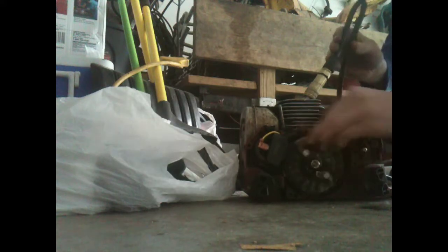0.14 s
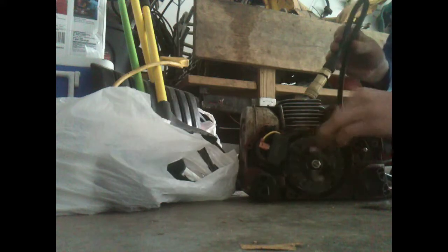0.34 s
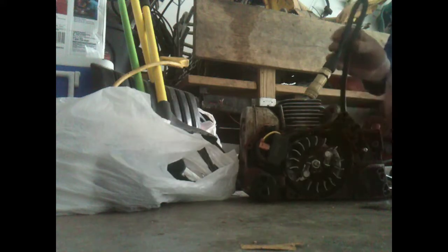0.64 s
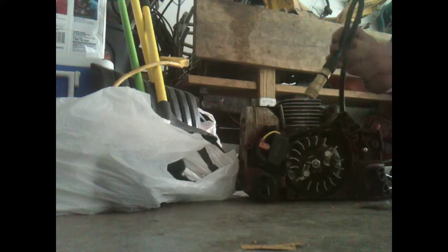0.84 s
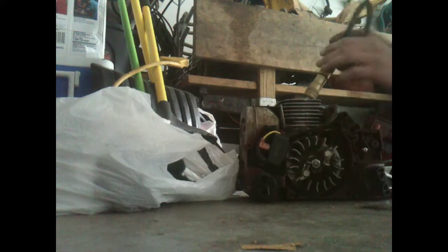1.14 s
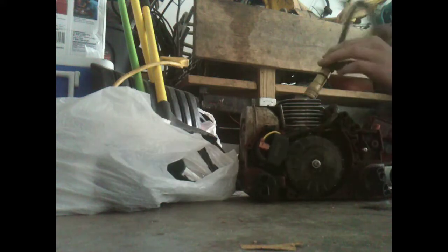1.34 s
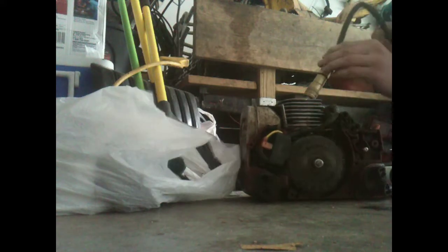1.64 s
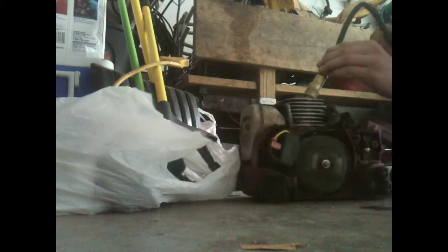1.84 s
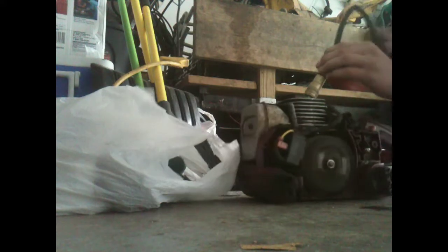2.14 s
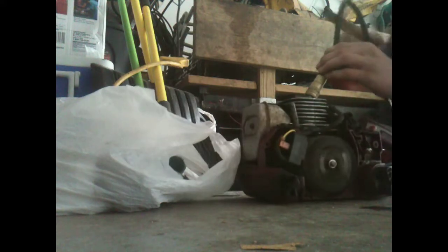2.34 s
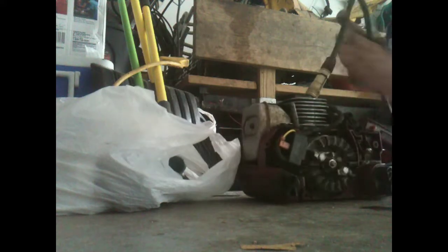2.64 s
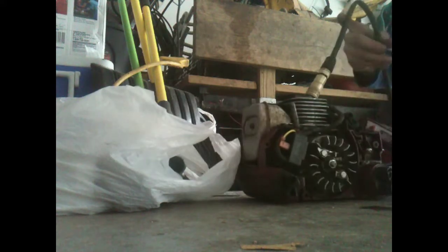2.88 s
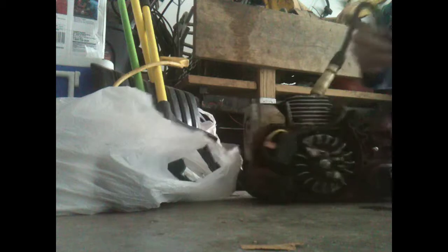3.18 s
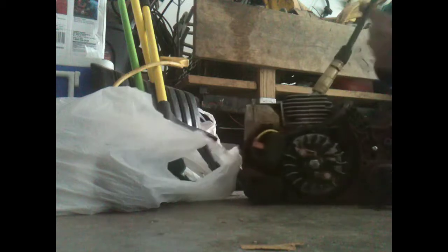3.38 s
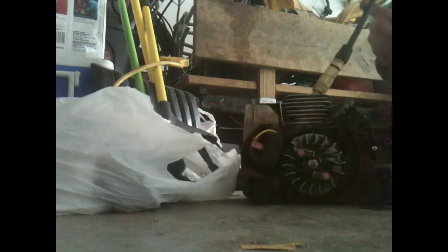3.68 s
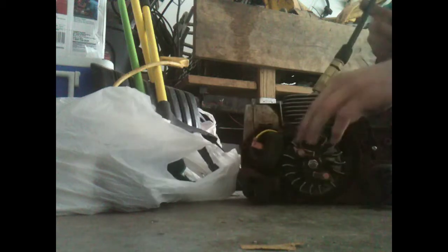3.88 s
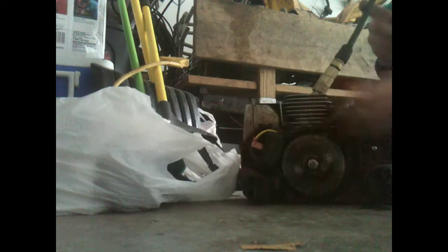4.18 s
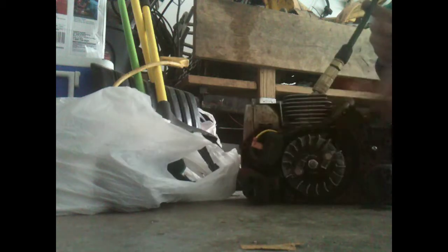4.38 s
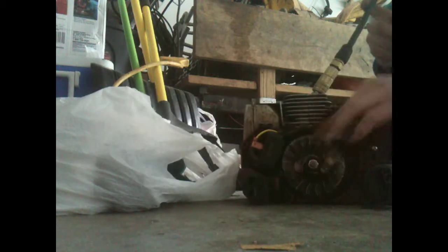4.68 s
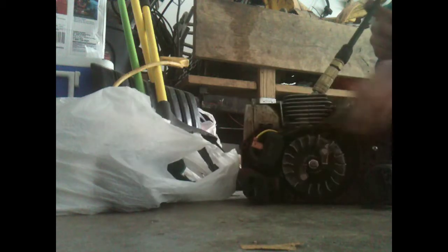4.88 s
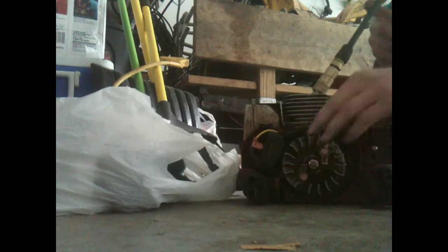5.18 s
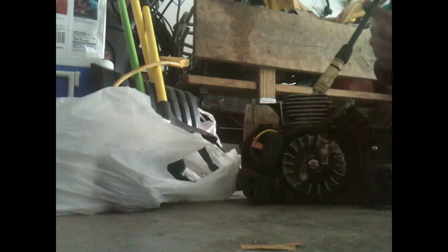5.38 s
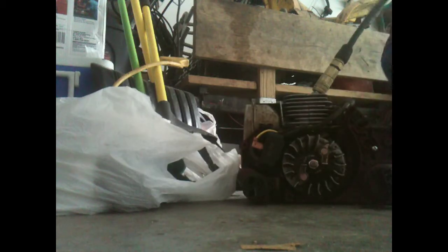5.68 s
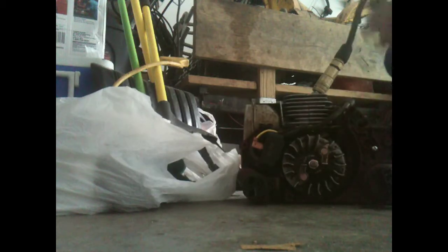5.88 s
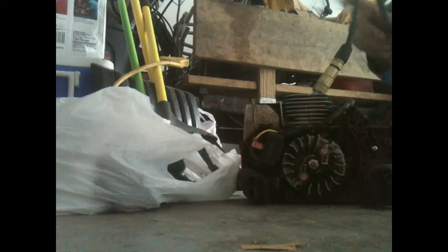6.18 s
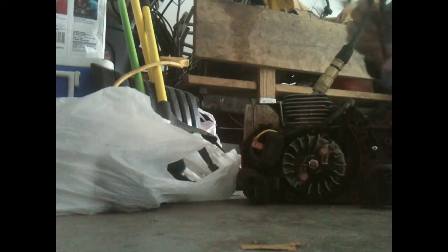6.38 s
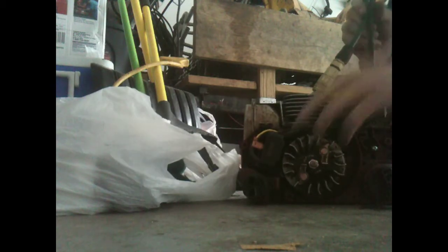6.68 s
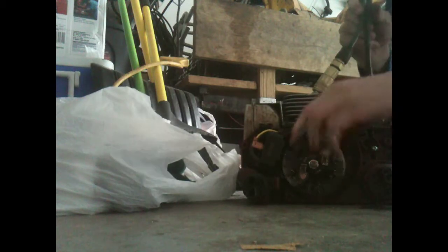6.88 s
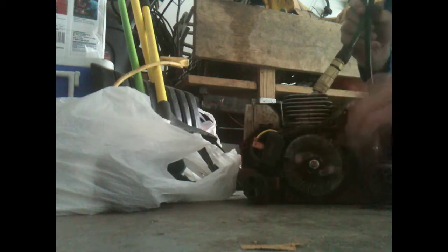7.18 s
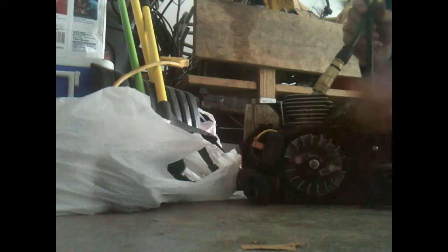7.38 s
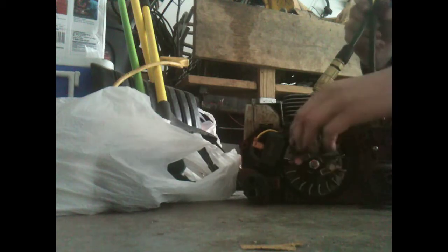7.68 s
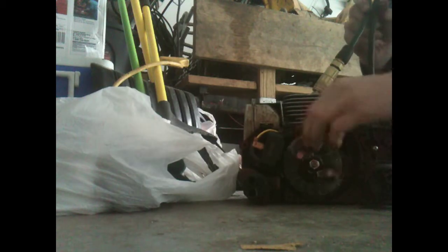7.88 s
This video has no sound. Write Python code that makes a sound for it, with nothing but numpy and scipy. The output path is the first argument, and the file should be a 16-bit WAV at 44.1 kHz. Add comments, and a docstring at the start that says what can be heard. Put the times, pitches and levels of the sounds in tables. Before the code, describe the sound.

In a garage, close to the microphone, small ticks and knocks lead into a one-second burst of rapid airy puffs as compressed air spins a small engine. It slows and stalls with a clack. A long, bright hiss with a thin whistle follows, wavering in strength and briefly choked, then cuts off. Quiet ticks, a soft pop, a sharp fin scrape and small knocks finish over faint rumble and hiss.

```python
"""Over low rumble and steady hiss come small ticks, a faint wheeze of air and sharp knocks on valve and cover.
A small two-stroke engine on a garage floor, fed compressed air by a hand valve, then spins for about a second,
puffing once a turn; it stalls and shaped noise hisses and whistles on through the open port.
Decaying modes ring as fingers flick the finned flywheel; trapped air pops and a nail scrapes the fins.
One close microphone feeds both channels, with a little echo of the garage."""
import sys
import numpy as np
from scipy import signal
from scipy.fft import rfft, irfft, next_fast_len
from scipy.io import wavfile
from scipy.ndimage import uniform_filter1d

SR = 44100
rng = np.random.default_rng(int(sys.argv[2]) if len(sys.argv) > 2 else 0)


def undo_db(level):
    """Turn decibels back into plain size, where 20 dB means ten times bigger."""
    steps = np.asarray(level, float) / 20
    return 10 ** steps


def unload_audio(sound):
    """Save the sound as a 16-bit wav file, at the path given as the first command line argument."""
    columns = np.transpose(np.atleast_2d(sound))
    # keep every value between -1 and 1, then stretch to whole-number steps
    steps = np.round(np.clip(columns, -1, 1) * 32767)
    wavfile.write(sys.argv[1], SR, steps.astype(np.int16))


N = 354123
TIME = np.arange(N) / SR


def noise(spectrum):
    """Noise of rms 1 with the colour of (Hz, dB) points."""
    size = next_fast_len(N)
    hz, db = np.transpose(spectrum)
    log_hz = np.log(np.arange(1, size // 2 + 2) * SR / size)
    colour = undo_db(np.interp(log_hz, np.log(hz), db))
    x = irfft(rfft(rng.standard_normal(size)) * colour, size)[:N]
    return x / np.std(x)


def walk(rate):
    """Smoothed random drift with spread 1, redrawn rate times a second."""
    k = int(SR / rate)
    steps = np.repeat(rng.standard_normal(N // k + 1), k)
    x = uniform_filter1d(uniform_filter1d(steps, k), k)[:N]
    return x / np.std(x)


def twice(x, modes):
    """Sum of steep resonances (Hz, width, dB): each one is passed two times."""
    out = 0
    for hz, width, db in modes:
        peak = signal.iirpeak(hz, hz / width, SR)
        out = out + undo_db(db) * signal.lfilter(*peak, signal.lfilter(*peak, x))
    return out


def wavering(x, modes, waver_db):
    """Steep resonances whose strengths drift apart as the flow shifts."""
    return sum(undo_db(waver_db * walk(6)) * twice(x, [mode]) for mode in modes)


def curve(table, lag_s=0.0):
    """A table joined by straight lines in time; very low outside it."""
    s, value = np.transpose(table)
    return np.interp(TIME - lag_s, s, value, left=-120, right=-120)


def hump(s, rise, fall):
    """0 at s, growing to 1 a rise before and a fall after it, and further beyond."""
    return np.where(TIME < s, (s - TIME) / max(rise, 0.003), (TIME - s) / max(fall, 0.003))


def decay(t, t60):
    """Exponential fade of 60 dB in t60 seconds."""
    return np.exp(-np.log(1000) * t / t60)


def add(out, s, sound):
    """Lay a sound into the track at s seconds."""
    i = int(s * SR)
    out[i:i + len(sound)] += sound[:N - i]


def ring(modes, length=0.93):
    """Decaying modes after one clean blow, swelling over 1.5 ms; length scales their ring times."""
    t = TIME[:SR // 2]
    hz, db, t60 = np.transpose(modes)[:, :, None]
    envelope = decay(t, t60 * length) * np.minimum(t / 0.0015, 1)
    return np.sum(undo_db(db) * envelope * np.sin(2 * np.pi * hz * t), axis=0)


def knock(modes, contact_s, centre_hz, spread_db):
    """A blow rings the modes near centre_hz most; the uneven contact rattles them on. Peak 1."""
    rattle_db = -4.5
    t = TIME[:SR // 2]
    hz, db, t60 = np.transpose(modes)[:, :, None]
    strength = undo_db(db - spread_db * np.abs(np.log2(hz / centre_hz)))
    rings = np.sum(strength * decay(t, t60) * np.sin(2 * np.pi * hz * t), axis=0)
    push = TIME[:SR // 25] / contact_s
    push = push * np.exp(-push) * rng.standard_normal(len(push))
    rattle = signal.fftconvolve(rings, push / np.sqrt(np.sum(push ** 2)))[:len(t)]
    x = rings * np.minimum(t / contact_s, 1) + undo_db(rattle_db) * rattle
    x = signal.lfilter(*signal.butter(2, centre_hz / 3, "high", fs=SR), x)
    return x / np.max(np.abs(x))


# Colour of the distant rumble. Each row: frequency in Hz, relative level in dB per Hz.
RUMBLE_COLOUR = [(12, -44), (30, -29.5), (120, -7.5), (200, -1), (470, -7), (870, -5.5), (1700, -14.5),
                 (3000, -25), (6000, -46)]
# Colour of the microphone hiss. Each row: frequency in Hz, relative level in dB per Hz.
HISS_COLOUR = [(500, -30), (1500, -1), (4000, -0.5), (6500, 0), (14500, 2), (15800, -3.5)]


def background():
    """Distant rumble and microphone hiss: two coloured noises whose levels drift slowly."""
    rumble = undo_db(-66 + 1.1 * walk(1.6)) * noise(RUMBLE_COLOUR)
    hiss = undo_db(-66.3 + 1.3 * walk(2.8)) * noise(HISS_COLOUR)
    return rumble + hiss


def crack(t60, hz, width):
    """A short burst of noise around hz, peak 1."""
    t = TIME[:SR // 20]
    x = twice(rng.standard_normal(len(t)) * decay(t, t60), [(hz, width, 0)])
    return x / np.max(np.abs(x))


# Small dry ticks. Each row: start in seconds, peak of the body in dB, its centre in Hz,
# peak of the bright snap in dB.
TICK_EVENTS = [(.21, -47, 5000, -65), (.352, -48, 7800, -72.5), (0.4449, -31, 7650, -33.5),
               (.455, -50, 7000, -34), (.8, -43.5, 7460, -58), (2.587, -39, 10600, -54),
               (2.598, -45.5, 8000, -57.5), (2.612, -49, 10000, -65), (6.453, -45, 8700, -64),
               (6.488, -48, 9600, -65), (6.616, -46, 11060, -59), (7.19, -38, 6160, -34),
               (7.636, -55, 7030, -53), (7.815, -60, 7000, -47.5), (7.827, -37, 6000, -38.5)]


def ticks():
    """Each tick is a noise burst around its own pitch, with a brighter snap on top."""
    out = np.zeros(N)
    for s, db, hz, snap_db in TICK_EVENTS:
        body = undo_db(db) * crack(0.0083, hz, 0.67 * hz)
        snap = undo_db(snap_db) * crack(0.008, 12900, 8000)
        add(out, s, body + snap)
    return out


# A slow hand turn wheezes air through the port. Each row: time of the peak in seconds, level in dB,
# rise in seconds, fall in seconds (each to the edge, where the level is 15 dB down).
WHEEZE_EVENTS = [(.23, -57.5, 0.12, .08), (.41, -60, .07, .04), (7.076, -53, .04, .04),
                 (7.155, -60, .03, .03), (7.445, -62, .04, .06), (7.86, -66.5, 0.018, .04),
                 (8.0, -66, .09, .1)]


def wheeze_flow():
    """Strength of the hand-turned air: rounded swells, falling ever faster in dB from the peak."""
    edge_db = -15
    return sum(undo_db(db + edge_db * hump(s, rise, fall) ** 2) for s, db, rise, fall in WHEEZE_EVENTS)


# Colour of the free air jet. Each row: frequency in Hz, relative level in dB per Hz.
JET_COLOUR = [(2500, -45), (3400, -19), (4300, -25), (5400, -17), (6200, -12), (7700, -9), (8500, -2),
              (10400, -2.5), (12600, -1.5), (13700, -1.5), (14800, -12), (15800, -10)]


def turbulent_jet(strength):
    """Air tearing out of the port: bright noise with a gently unsteady level."""
    return strength * undo_db(0.41 * walk(25)) * noise(JET_COLOUR)


# Valve and cover knocked. Each row: start in seconds, peak in dB, centre in Hz, contact in ms,
# fall-off away from the centre in dB per octave.
KNOCK_EVENTS = [(.453, -22.5, 1340, 0.93, 9), (0.46, -34, 1500, 0.94, 9), (0.5096, -24.5, 2500, 1.1, 13),
                (0.5436, -32, 1210, 1.1, 12), (1.304, -36.5, 1590, 2.4, 4), (1.395, -17, 2370, .6, 14),
                (2.4043, -17.5, 1720, 1.1, 9), (2.479, -25, 1990, 1.35, 1.5),
                (2.558, -41.5, 1295, 0.92, 9.5), (6.615, -47, 2000, 0.6, 9), (7.147, -53.5, 1300, 1.2, 9),
                (7.218, -30, 1770, 0.67, 11.5), (7.561, -34.5, 1720, 0.43, 15),
                (7.795, -48.5, 2130, 1.2, 19)]
# Modes of the cover. Each row: frequency in Hz, relative level in dB, 60 dB ring time in seconds.
COVER_MODES = [(500, -3.5, .04), (1011, -4, 0.06), (1160, -12, .02), (1293, -5, 0.027), (1500, 3.5, 0.022),
               (1730, 5, .014), (1945, -1, .014), (2252, 1, 0.014), (2593, -1, 0.011), (3130, -0.5, 0.014),
               (3840, -2.5, 0.013), (6000, 0.5, 0.011), (7040, 4.5, .006)]


def cover_knocks():
    """Each blow rings the cover, its pitch centre and contact time setting the tone."""
    out = np.zeros(N)
    for s, db, hz, contact_ms, spread_db in KNOCK_EVENTS:
        add(out, s, undo_db(db) * knock(COVER_MODES, contact_ms / 1000, hz, spread_db))
    return out


# Hand valve during the run. Each row: time in seconds, level of the leak past the piston in dB.
RUN_VALVE_LEVEL = [(1.31, -70.5), (1.33, -65.5), (1.385, -35.5), (1.45, -25), (1.55, -24.5), (1.8, -26),
                   (2.2, -28.5), (2.33, -29), (2.4, -40), (2.49, -51.5), (2.52, -58), (2.6, -64),
                   (2.74, -85.5)]
# Colour of the leak. Each row: frequency in Hz, relative level in dB per Hz.
LEAK_COLOUR = [(2000, -19), (3000, -9.5), (4300, -7.5), (5500, -3.5), (6500, -4), (9000, 0.5), (12500, 1),
               (15000, -4), (15800, -11)]


def piston_leak():
    """Air slipping past the piston follows the hand valve; returns its strength and its noise."""
    strength = undo_db(curve(RUN_VALVE_LEVEL))
    return strength, strength * noise(LEAK_COLOUR)


# Crank speed from the first port opening until the engine stalls.
# Each row: time in seconds, speed in turns per second.
CRANK_SPEED = [(1.392, 14.43), (1.487, 15.63), (1.567, 21.67), (1.697, 24.56), (1.817, 24.15),
               (2.247, 22.79), (2.337, 20.01), (2.437, 12.69), (2.53, 12.69)]


def port_flow():
    """Each turn the port opens fast, the flow sags as the cylinder empties, and the piston shuts it."""
    # shares of a turn
    rise_share, open_share, open_scatter, shut_share, transfer_share = 0.16, 0.52, 0.07, 0.17, 0.55
    puff_db, puff_scatter_db, sag_db, fill_lag_s = 11.5, 0.66, -3, 0.011
    roar_db, roar_scatter_db = -8.5, 1.5
    drum_db, drum_scatter_db, drum_speed_power, full_speed = -9, 5.5, 2.2, 24  # full speed in turns/s
    speed = np.maximum(curve(CRANK_SPEED), 0)
    turns = np.cumsum(speed) / SR
    turn, spinning = turns % 1, speed > 0
    # four random draws, held for one turn each
    draws = rng.standard_normal((int(turns[-1]) + 1, 4))
    puff, roar, drum, share = draws[turns.astype(int)].T
    past_open = turn - np.clip(open_share + open_scatter * share, 0.08, 0.8)
    # shutting takes a further 6, then 18 dB off the sagging flow
    shutting_db = np.interp(past_open, [0, shut_share, shut_share + 0.5], [0, -6, -18])
    shape_db = sag_db * turn / open_share + shutting_db
    charge_db = curve(RUN_VALVE_LEVEL, fill_lag_s) + puff_db + puff_scatter_db * puff
    charge = spinning * undo_db(charge_db)
    jet = charge * np.minimum(turn / rise_share, 1) * undo_db(shape_db)
    port_roar = jet * undo_db(roar_db + roar_scatter_db * roar)
    # the transfer port opens later in the turn; a faster piston drums harder
    thrum = charge * (speed / full_speed) ** drum_speed_power
    thrum = thrum * undo_db(drum_db + drum_scatter_db * drum)
    thrum = thrum * np.exp(-((turn - transfer_share) / 0.15) ** 2)
    return jet, port_roar, thrum


# Colour of the puffs. Each row: frequency in Hz, relative level in dB per Hz.
PUFF_COLOUR = [(1760, -38.5), (3000, -16), (3400, -17), (4310, -13), (5810, -10), (6400, 0), (7010, -2.5),
               (8280, 1.5), (12400, 4.5), (14100, 4), (15800, -6.5)]


def port_puffs(port_jet):
    """Once a turn the open port spits bright, slightly ragged noise."""
    return port_jet * undo_db(0.37 * walk(180)) * noise(PUFF_COLOUR)


# Crankcase resonances. Each row: frequency in Hz, width of each pass in Hz, level in dB.
CRANKCASE_MODES = [(151, 150, 2), (516, 150, 3.5), (756, 91, 10)]


def crankcase_drumming(thrum):
    """Air through the transfer port drums the hollow crankcase: noise in low, steep resonances."""
    return twice(thrum * rng.standard_normal(N), CRANKCASE_MODES)


# Colour of the casing roar. Each row: frequency in Hz, relative level in dB per Hz.
ROAR_COLOUR = [(40, -43.5), (70, -35.5), (210, -9), (490, -5), (1050, -4), (1400, -3.5), (1700, -2.5),
               (2300, -2.5), (3000, -7), (3500, -10.5), (4500, -15.5), (5800, -38)]
# Casing cavities. Each row: frequency in Hz, width of each pass in Hz, level against the roar in dB.
CAVITY_MODES = [(492, 153, -3.5), (722, 98, -8), (1647, 274, -1), (1970, 540, -7.5), (2416, 610, -14),
                (3000, 300, -5.5)]


def casing_roar(wheeze, leak, port_roar, push_db):
    """Every air flow drives the casing cavities: a mid-range roar with wavering resonances."""
    # the stalled jet's roar grows faster in dB than the jet itself
    stalled = undo_db(-35.5 + 1.2174 * push_db)
    flow = stalled + undo_db(-13.5) * wheeze + undo_db(-10) * leak + port_roar
    drive = flow * undo_db(1.22 * walk(60)) * noise(ROAR_COLOUR)
    return undo_db(-3) * (drive + wavering(drive, CAVITY_MODES, 3.4))


# Hand valve with the engine stalled. Each row: time in seconds, level of the jet in dB.
STALL_VALVE_LEVEL = [(2.81, -72.5), (2.83, -59.5), (2.882, -40), (2.934, -36), (3.012, -38.5), (3.158, -28),
                     (3.27, -19), (3.534, -20.5), (3.645, -31), (3.76, -28.5), (4.05, -25), (4.165, -28.5),
                     (4.28, -25), (4.65, -28), (5.32, -27.5), (5.53, -20), (6.0, -21.5), (6.064, -26),
                     (6.098, -42), (6.156, -58), (6.43, -86)]
# Silencer box resonances. Each row: frequency in Hz, width of each pass in Hz, level in dB.
SILENCER_MODES = [(1900, 800, 6.5), (2500, 420, 6.5)]


def silencer_bark(port_roar, jet_db):
    """Each puff barks through the silencer box, and so does the first air after the valve reopens."""
    first_air_db, first_air_s = -9, 0.45
    since_open = TIME - STALL_VALVE_LEVEL[0][0]
    first = undo_db(jet_db + first_air_db) * np.clip(1 - since_open / first_air_s, 0, 1)
    burst = (port_roar + first) * undo_db(3.1 * walk(80)) * rng.standard_normal(N)
    return twice(burst, SILENCER_MODES)


# Low thumps and thuds: the engine rocks as it stalls, and later dull thuds come as it is handled.
# Each row: start in seconds, level in dB, frequency in Hz,
# nominal 60 dB ring time in seconds (ring() shortens it).
THUMP_EVENTS = [(2.37, -37, 30, .2), (2.49, -46, 40.3, 0.16), (6.99, -46.5, 473, 0.07),
                (2.551, -54.5, 132, 0.13), (7.07, -52.5, 165, .12), (7.19, -52, 466, 0.069),
                (7.826, -52, 290, 0.067)]


def thumps_and_thuds():
    """Each thump or thud sounds one short decaying mode."""
    out = np.zeros(N)
    for s, db, hz, t60 in THUMP_EVENTS:
        add(out, s, ring([(hz, db, t60)]))
    return out


# The wheel is rocked and the piston chokes the stream. Each row: time of deepest choke in seconds,
# depth in dB, closing time in seconds, reopening time in seconds.
CHOKE_EVENTS = [(4.713, -6.5, .035, 0.013), (4.775, -9.5, .04, 0.022), (4.834, -5.5, .035, 0.1)]


def stalled_jet_db():
    """Level of the air through the stalled port: the hand valve, dipped by each choke."""
    jet_db = curve(STALL_VALVE_LEVEL)
    for s, depth_db, close, reopen in CHOKE_EVENTS:
        jet_db = jet_db + depth_db * np.maximum(1 - hump(s, close, reopen), 0)
    return jet_db


# Lower bore whistle. Each row: frequency in Hz, width of each pass in Hz, level in dB.
BORE_LOW_MODES = [(4754, 210, 18), (4960, 350, 15.5)]
# Upper bore whistle. Each row: frequency in Hz, width of each pass in Hz, level in dB.
BORE_HIGH_MODES = [(6690, 620, 12), (8700, 580, 6)]


def port_whistle(push_db):
    """The stalled port whistles: it settles in slowly after the valve reopens and starves on a weak jet."""
    build_s, starve_db = 0.41, -18
    build = np.clip((TIME - STALL_VALVE_LEVEL[0][0]) / build_s, 0, 1) ** 2
    settled = build * undo_db(0.59 * np.minimum(push_db - starve_db, 0))
    draught = settled * rng.standard_normal(N)
    low = wavering(undo_db(-44.5 + 0.52 * push_db) * draught, BORE_LOW_MODES, 1.2)
    high = wavering(undo_db(-41.5 + 0.2 * push_db) * draught, BORE_HIGH_MODES, 2.9)
    return low + high


# Flywheel fins flicked. Each row: start in seconds, then the level in dB of each of the four mode families.
FLICK_EVENTS = [(4.791, -37.5, -58, -35, -30), (7.191, -57, -47, -72.5, -34), (7.636, -77.5, -77, -55, -62),
                (7.817, -65, -72, -55.5, -58), (7.826, -60.5, -65, -60, -54)]
# Flywheel modes in four families. Each row: frequency in Hz, relative level in dB,
# 60 dB ring time in seconds before the hand shortens it.
WHEEL_MODES = [
    [(3531, -11, .1), (4045, 0, .45)],
    [(4490, -10, .28), (5195, -4, .45), (5225, -9, .3)],
    [(6998, 0, .12), (8950, -8, .05)],
    [(12050, -3, .26), (12180, -3, .06), (12700, -15, .06)],
]


def flywheel_flicks():
    """A finger flick rings the metal wheel, each flick mixing the mode families its own way."""
    out = np.zeros(N)
    for s, *families in FLICK_EVENTS:
        for family_db, modes in zip(families, WHEEL_MODES):
            # the hand allows 0.92 of the free ring
            add(out, s, undo_db(family_db) * ring(modes, 0.92))
    return out


# Colour of the pop. Each row: frequency in Hz, relative level in dB per Hz.
POP_COLOUR = [(59, -71.5), (100, -49), (568, -0.5), (849, -13), (1300, -8.5), (1780, -16), (1980, -9.5),
              (2610, -13.5), (7220, -13.5), (13300, -24.5), (15800, -36.5)]


def valve_pop():
    """Trapped air pops out of the valve: a 3 ms rise, then fluttering noise that dies away."""
    out = np.zeros(N)
    t = TIME[:SR // 2]
    level = undo_db(-38.5 + 1.15 * walk(300)[:len(t)])
    envelope = np.minimum(t / 0.003, 1) * decay(t, 0.34)
    add(out, 6.7195, level * envelope * noise(POP_COLOUR)[:len(t)])
    return out


# Fin modes. Each row: frequency in Hz, relative level in dB, 60 dB ring time in seconds.
FIN_MODES = [(4270, -17, 0.13), (4340, -16, .09), (4420, -9, 0.042), (4680, 1, 0.018), (4830, -8, 0.032),
             (5330, -10, 0.034), (5570, -17.5, 0.044), (4500, -4.5, 0.023), (8970, -9.5, .02),
             (10030, -3, .012), (12000, 10.5, 0.029), (12300, -16, .12), (14000, -11.5, 0.022)]


def nail_scrape():
    """A nail scrapes over the fins: a bright blow, then a longer, softer and lower contact."""
    out = np.zeros(N)
    start_s, peak_db = 6.9905, -23
    add(out, start_s, undo_db(peak_db) * knock(FIN_MODES, 0.0011, 8000, 0))
    add(out, start_s + 0.0056, undo_db(peak_db - 20) * knock(FIN_MODES, 0.009, 4600, 6))
    return out


def engine_air():
    """All moving air: free jets, leak, puffs and the cavities and whistles they drive."""
    wheeze = wheeze_flow()
    leak, leak_noise = piston_leak()
    port_jet, port_roar, thrum = port_flow()
    jet_db = stalled_jet_db()
    push_db = jet_db + 27  # against a reference jet of -27 dB
    jets = turbulent_jet(wheeze + undo_db(jet_db)) + leak_noise + port_puffs(port_jet)
    cavities = crankcase_drumming(thrum) + casing_roar(wheeze, leak, port_roar, push_db)
    return jets + cavities + silencer_bark(port_roar, jet_db) + port_whistle(push_db)


def handling():
    """Ticks, knocks, thumps and thuds, flicks, the pop of trapped air and the scrape, summed."""
    return ticks() + cover_knocks() + thumps_and_thuds() + flywheel_flicks() + valve_pop() + nail_scrape()


def room(x):
    """Dense wall echoes whose treble dies first."""
    split_hz, t60_s, treble_t60_s = 6900, 0.6, 0.19
    t = TIME[:SR]
    low = signal.lfilter(*signal.butter(2, split_hz, fs=SR), rng.standard_normal(SR))
    high = signal.lfilter(*signal.butter(2, split_hz, "high", fs=SR), rng.standard_normal(SR))
    tail = low * decay(t, t60_s) + high * decay(t, treble_t60_s)
    tail = tail * np.clip(t / 0.0056, 0, 1)
    return signal.fftconvolve(x, tail / np.sqrt(np.sum(tail ** 2)))[:N]


def scene():
    """Engine and hands in the garage, over distant rumble and microphone hiss."""
    engine, hands = engine_air(), handling()
    # the hands are nearer, so drier
    echoes = undo_db(-11.5) * room(engine + undo_db(-1) * hands)
    mono = background() + engine + hands + echoes
    return np.array([mono, mono])


def low_pass(x):
    """Removes everything above the highest recorded frequency."""
    return signal.sosfilt(signal.butter(12, 15960, fs=SR, output="sos"), x)


def record(dry):
    """One microphone on both channels, weak in the bass below 93 Hz."""
    mix = signal.lfilter(*signal.butter(2, 93, "high", fs=SR), dry)
    return low_pass(mix)


dry = scene()
out = record(dry)
unload_audio(out)
```